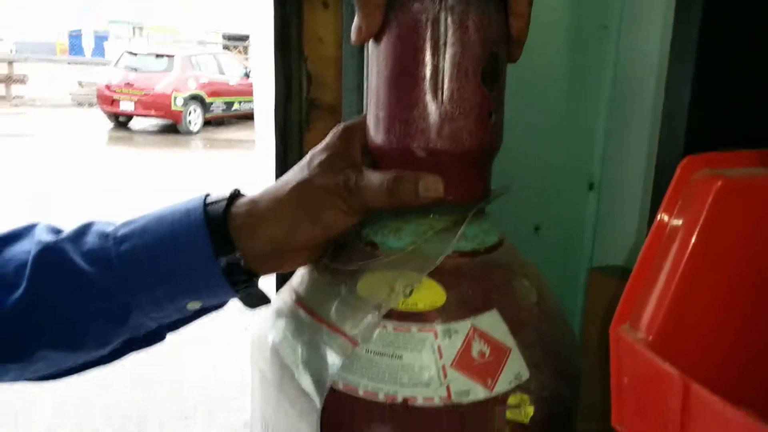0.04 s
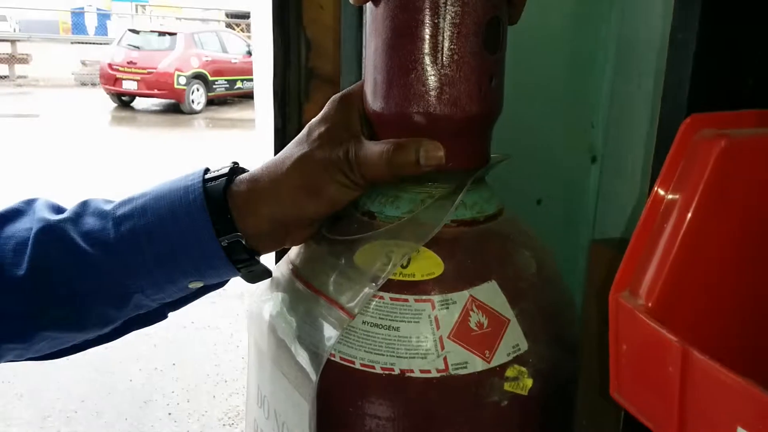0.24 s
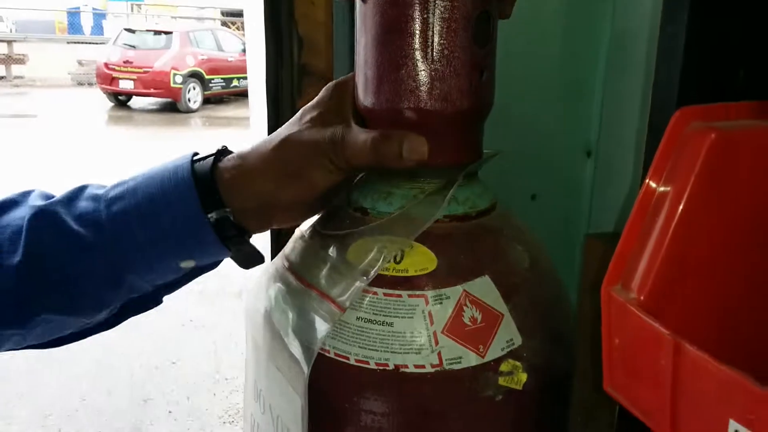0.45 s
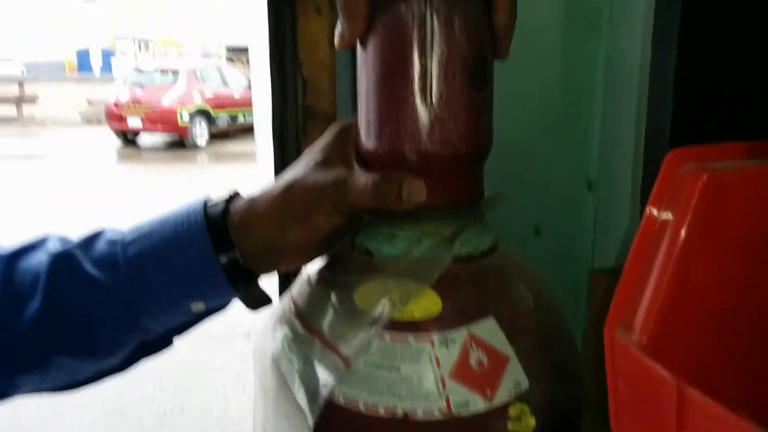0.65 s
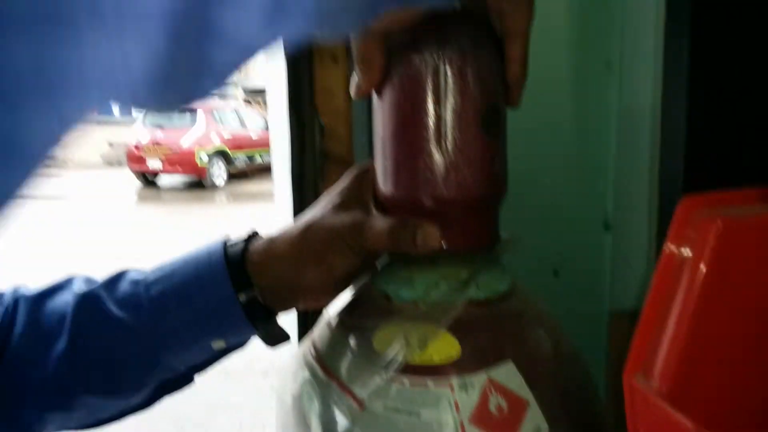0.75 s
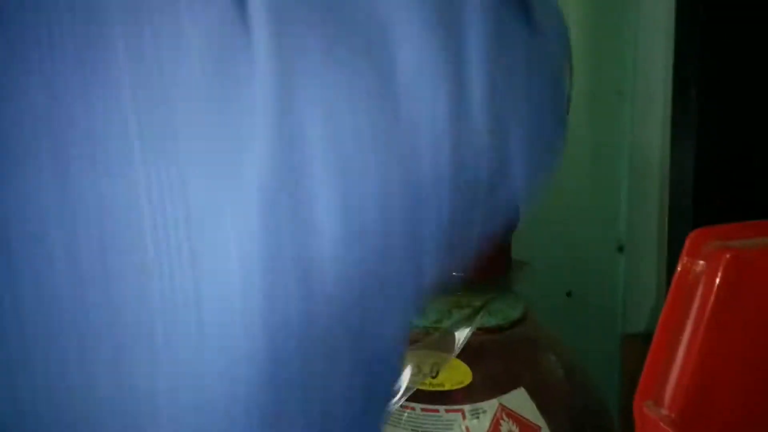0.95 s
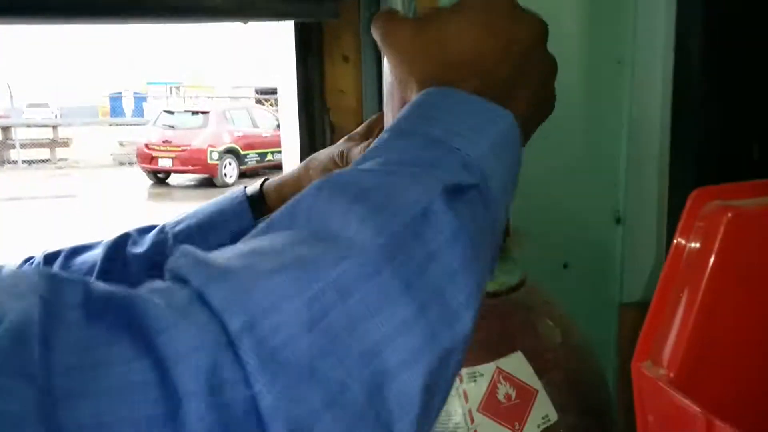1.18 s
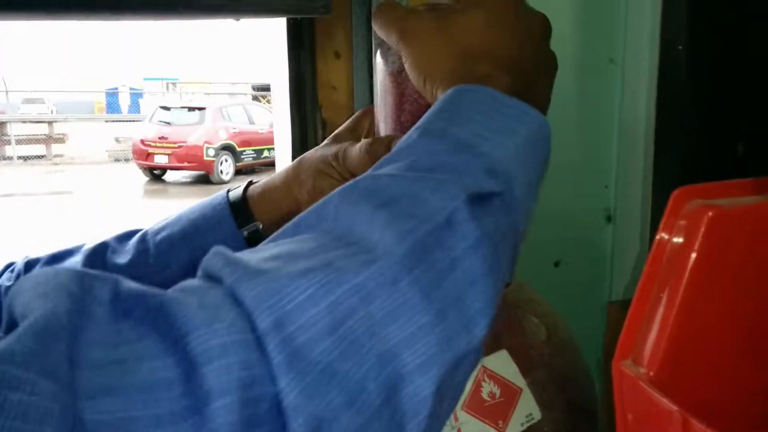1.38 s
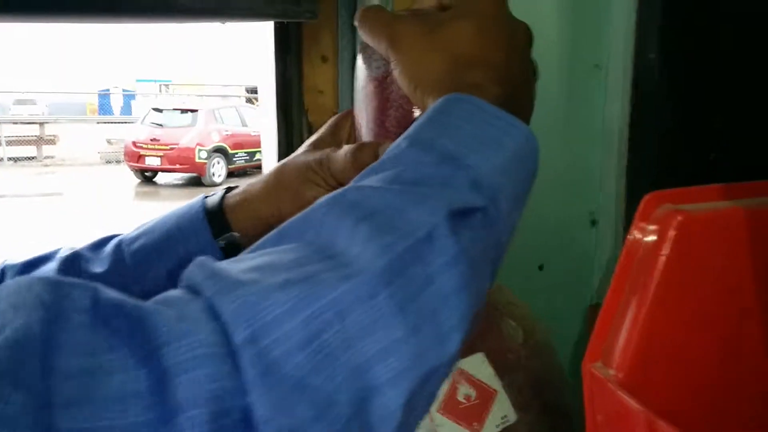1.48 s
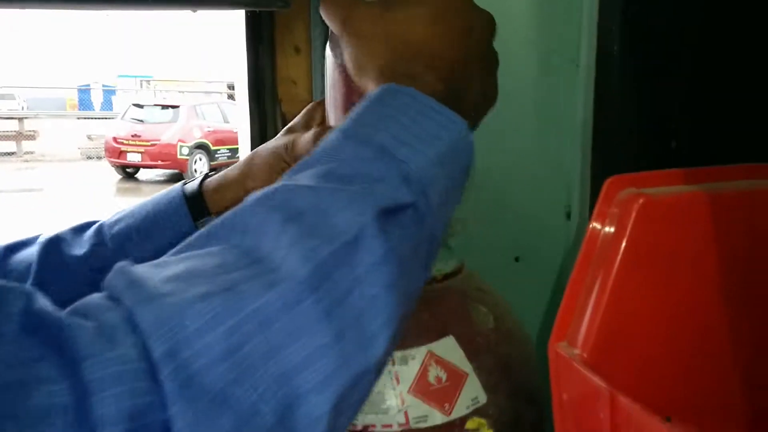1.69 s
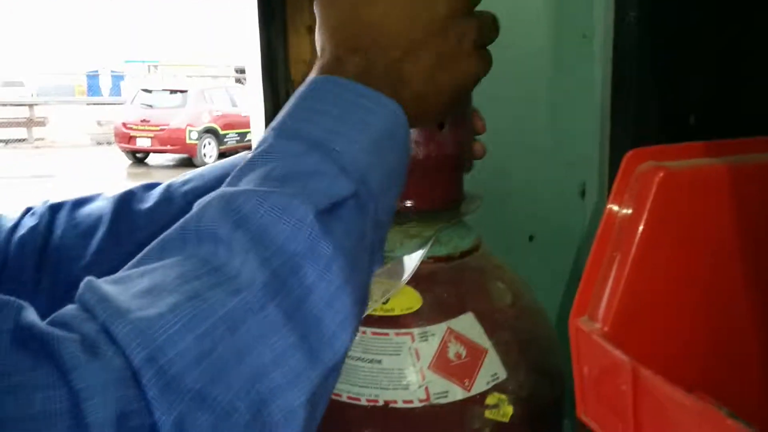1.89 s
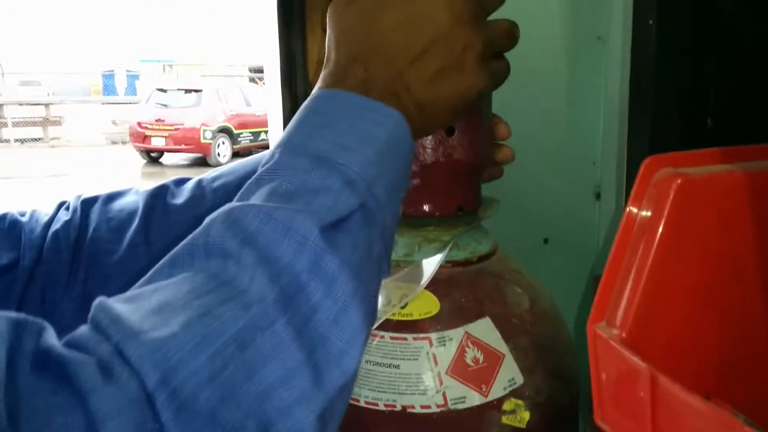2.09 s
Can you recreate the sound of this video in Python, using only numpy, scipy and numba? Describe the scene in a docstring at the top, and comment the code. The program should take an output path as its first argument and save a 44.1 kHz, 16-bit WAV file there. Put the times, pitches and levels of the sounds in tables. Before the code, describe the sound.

Close phone pickup in a shed doorway: quiet hand rubs and soft thumps, then a loud metal squeal breaking into a rough grind and cylinder ring, then another twist, brighter ringing and a hollow tone at the end.

```python
"""In a shed doorway, a steel cap is twisted twice onto the thread of a gas cylinder, close to a phone.
Each twist squeals (a harmonic stack whose slip rate slows) and breaks into a grind of dense clicks.
Damped cap modes color both; the cap clangs, and each jolt sets off decaying cylinder modes and a thud.
Finger scuffs (filtered noise bursts) and soft low thumps (short bass cycles) surround the twists.
Flickering noise bands and a faint hum make the quiet floor; a hollow tone swells at the end."""
import sys
import numpy as np
from scipy import signal
from scipy.fft import rfft, irfft
from scipy.io import wavfile
from scipy.ndimage import uniform_filter1d
from numba import njit

SR = 44100
rng = np.random.default_rng(int(sys.argv[2]) if len(sys.argv) > 2 else 0)


def to_wav(s):
    """Save 16-bit WAV."""
    ch = np.atleast_2d(s).T  # columns
    pcm = np.round(np.clip(ch, -1, 1) * 32767)  # PCM
    wavfile.write(sys.argv[1], SR, pcm.astype(np.int16))


def gain_from_db(level_db):
    """Convert decibel levels to linear amplitude factors (20 dB per decade)."""
    decades = np.asarray(level_db, float) / 20
    return 10 ** decades


N = 94065
TOP_HZ = 15800  # top of the squeal's overtones and of the microphone


def level(x, db):
    """Scale to an rms level."""
    return x * gain_from_db(db) / np.sqrt(np.mean(x ** 2))


def band(x, hz, width_hz):
    """One resonance, gain 1 at the centre."""
    return signal.lfilter(*signal.iirpeak(hz, hz / width_hz, fs=SR), x)


def twice(x, hz, width_hz):
    """A steeper resonance: two in series, each widened so the pair keeps the stated width."""
    wide_hz = 1.55 * width_hz
    return band(band(x, hz, wide_hz), hz, wide_hz)


def walk(rate_hz):
    """Smooth random wander of spread 1."""
    k = max(int(SR / rate_hz), 1)
    noise = rng.standard_normal(N)
    return level(uniform_filter1d(uniform_filter1d(noise, k), k), 0)


def ring(t0, hz, db, t60, rise=0.00075):
    """A decaying mode that starts at t0."""
    t = np.maximum(np.arange(N) / SR - t0, 0)
    return gain_from_db(db - 60 * t / t60) * (1 - np.exp(-t / rise)) * np.sin(2 * np.pi * hz * t)


ROOM_DB, ROOM_T60_S, ROOM_TREBLE_T60_S = -3, 0.6, 0.57
TREBLE_END_S = 0.18  # by now the cut has taken a further 20 dB off the treble


def room(x):
    """Diffuse shed echo, its treble cut off abruptly as if by a noise suppressor."""
    t = np.arange(SR) / SR
    noise = rng.standard_normal(SR) * np.clip(t / 0.0037, 0, 1)
    low, high = (signal.sosfilt(signal.butter(8, 5900, kind, fs=SR, output="sos"), noise)
                 for kind in ("low", "high"))
    low_tail = low * gain_from_db(-60 * t / ROOM_T60_S)
    high_tail = high * gain_from_db(-60 * t / ROOM_TREBLE_T60_S - 20 * (t / TREBLE_END_S) ** 3)
    tail = low_tail + high_tail
    return gain_from_db(ROOM_DB) * signal.fftconvolve(x, tail / np.sqrt(np.sum(tail ** 2)))[:N]


FLOOR_DB, FLOOR_FLICKER_DB, FLOOR_BASS_FLICKER_DB = -66, .6, 8.5
# spectrum of the yard and shed noise: f/Hz, relative level/dB per Hz
FLOOR_SPECTRUM = [(18, -33), (30, -8.5), (90, -8), (176, -13.5), (490, -8), (680, -9.5), (1000, -15.5),
                  (1600, -19.5), (4000, -30), (6000, -35), (15500, -37.5)]


def floor():
    """Quiet yard and shed noise in bands half an octave apart that flicker independently."""
    f = np.fft.rfftfreq(N, 1 / SR) + 1
    table_hz, table_db = np.transpose(FLOOR_SPECTRUM)
    shape = rfft(rng.standard_normal(N)) * gain_from_db(np.interp(np.log(f), np.log(table_hz), table_db))
    out = 0
    for octave in np.arange(4, 15, .5):  # band centre as a power of two in Hz
        flicker_db = FLOOR_BASS_FLICKER_DB if octave < 8 else FLOOR_FLICKER_DB
        weight = np.clip(1 - 2 * abs(np.log2(f) - octave), 0, 1)
        out = out + gain_from_db(flicker_db * walk(50)) * irfft(shape * weight, N)
    return level(out, FLOOR_DB)


def hum():
    """A faint wavering hum: noise through a narrow resonance."""
    return level(twice(rng.standard_normal(N), 488, 16), -75)


SCUFF_T60_S, SCUFF_BROAD_DB, SCUFF_ROOM_DB = 0.055, -41.5, -21
# finger scuffs on the cap: t/s, relative level/dB, length before the decay/s, centre f/Hz
SCUFF_RUBS = [(0.0, -50, 0.022, 1960), (0.042, -48.5, 0.0018, 1800), (0.145, -40.5, 0.018, 1500),
              (0.148, -42, 0.012, 5000), (0.174, -52.5, 0.0055, 830), (0.524, -66, 0.017, 2800),
              (0.703, -73, 0.02, 3470), (0.707, -55.5, 0.002, 1820), (0.821, -62, 0.033, 1970),
              (0.927, -40.5, 0.0051, 3560), (1.023, -53, 0.023, 1640), (1.049, -54.5, 0.019, 1310),
              (1.085, -63, 0.044, 2320), (1.796, -60.5, 0.12, 425)]
# what a scuffed cap rings with: f/Hz, width/Hz, relative level/dB
SCUFF_RESONANCES = [(245, 195, 6.5), (522, 125, 8), (1254, 320, 1), (1800, 206, 3), (2454, 600, -3),
                    (3540, 500, -1), (5000, 460, -4.5)]


def scuffs():
    """Short grainy rubs of band noise that ring a few dull tones, without high treble."""
    t, rubs = np.arange(N) / SR, np.zeros(N)
    noise = rng.standard_normal(N) * gain_from_db(1.65 * walk(410))
    for s, db, length, hz in SCUFF_RUBS:
        decay = gain_from_db(-60 * np.maximum(t - s - length, 0) / SCUFF_T60_S)
        env = np.clip((t - s) / 0.0019, 0, 1) * decay
        rubs += gain_from_db(db) * env * level(band(noise, hz, .7 * hz), 0)
    tones = 1.41 * sum(gain_from_db(db) * twice(rubs, f, w) for f, w, db in SCUFF_RESONANCES)
    out = tones + gain_from_db(SCUFF_BROAD_DB) * rubs
    out = signal.sosfilt(signal.butter(4, 6300, fs=SR, output="sos"), out)
    return out + gain_from_db(SCUFF_ROOM_DB) * room(out)


THUMP_OVERTONE_DB = -18.5
# low thumps: centre t/s, level/dB, length/s, f/Hz
LOW_THUMPS = [(0.184, -51, 0.027, 92), (0.324, -46.5, 0.018, 83), (0.372, -44.5, 0.024, 75),
              (0.663, -48.5, 0.02, 84), (0.867, -45, 0.0069, 91), (0.902, -46.5, 0.084, 83),
              (0.99, -45, 0.034, 90), (1.136, -47, 0.023, 82), (1.161, -43.5, 0.048, 90.3),
              (1.232, -48, 0.034, 97), (1.683, -54.5, 0.12, 89.4), (1.745, -53, 0.023, 78.4),
              (1.443, -30.5, 0.049, 91.3), (1.57, -46.5, 0.12, 87), (1.616, -49, 0.049, 86),
              (1.813, -47, 0.033, 84), (1.873, -48.5, 0.059, 86), (2.125, -44.5, 0.019, 135)]


def thumps():
    """Soft, slightly bent bass cycles under a bell-shaped envelope, with two weak overtones."""
    t, out = np.arange(N) / SR, 0
    for s, db, length, hz in LOW_THUMPS:
        phase = 2 * np.pi * hz * (t - s) + .5 * walk(40)
        env = np.exp(-2 * ((t - s) / length * 2) ** 2)
        overtones = np.sin(2 * phase) + np.cos(3 * phase)
        out = out + gain_from_db(db) * env * (np.sin(phase) + gain_from_db(THUMP_OVERTONE_DB) * overtones)
    return out


CAP_BROAD_DB = -22
# resonances of the hand-damped cap: f/Hz, width/Hz, relative level/dB (before the width weighting)
CAP_MODES = [(880, 920, -6.5), (1360, 89, -4), (1592, 157, 1.5), (1724, 52, 1), (1800, 140, 1),
             (2227, 480, 1), (3530, 184, 6), (3700, 83, 0), (4050, 1100, 3.5), (4710, 110, 3.5),
             (4810, 110, 0), (5105, 160, 2.5), (5440, 290, -7), (6590, 420, -3.5), (7626, 350, -0.5),
             (8300, 600, -5), (10670, 2800, -2), (11200, 400, -1.5), (13500, 5400, -8)]


def cap(x):
    """The cap's damped resonances, alternating in sign, over a broad response."""
    out = gain_from_db(CAP_BROAD_DB) * x
    for k, (f, w, db) in enumerate(CAP_MODES):
        out = out + (-1) ** k * gain_from_db(db) * np.sqrt(300 / w) * twice(x, f, w)
    return out


SQUEAL_DIRECT_DB, SQUEAL_CAP_DB = -1, -13
SQUEAL_WAVER_DB, SQUEAL_WAVER_HZ, SLIP_JITTER = 1.8, 250, .006
# overtones blur as the slips slow; smear in radians per overtone
STEADY_SLIP_HZ, SMEAR_RAD, SMEAR_PER_SLOWING, SMEAR_HZ = 1620, .05, 1.1, 1200
GRIND_CLICKS_HZ, GRIND_SCATTER_DB = 3500, 3  # mean click rate, scatter scale
# course of each twist: t/s, slip rate f/Hz, relative squeal level/dB,
# tilt/dB per harmonic step up to the third harmonic, relative grind level/dB
FIRST_TWIST = [(1.403, 1480, -66, -20, -70), (1.409, 1470, -28, -16, -52), (1.413, 1440, -10, -7, -34),
               (1.417, 1420, -17, -4, -31), (1.422, 1390, -11, -5, -28), (1.428, 1130, -16, -1, -23),
               (1.436, 880, -23, 4, -19), (1.444, 780, -36, 7, -17), (1.46, 600, -60, 0, -17),
               (1.52, 500, -70, 0, -18), (1.558, 500, -70, 0, -19), (1.575, 500, -70, 0, -40),
               (1.62, 500, -70, 0, -70)]
SECOND_TWIST = [(1.974, 1653, -48, -51, -92), (1.982, 1636, -7.5, -2, -18), (1.985, 1552, -20.5, 1, -30),
                (1.998, 1624, -15, 1.5, -41), (2.011, 1593, -21, 2.5, -53), (2.022, 1480, -16.5, 2.5, -10),
                (2.022, 1338, -19, 3, -19.5), (2.042, 845, -41, 11, -9), (2.077, 605, -82.5, -6, -19),
                (2.14, 556, -75, 1, -21.5)]
# squeal harmonics: multiple of the slip rate, relative level/dB
SQUEAL_HARMONICS = [(1, 0), (2, -4), (3, -6), (4, -12), (5, -11), (6, -13), (7, -12), (8, -13), (9, -16),
                    (10, -16), (11, -17), (13, -13), (15, -13)]


def thread():
    """Regular slips give a wavering overtone stack, irregular ones a dense grind; both ring the cap."""
    t = np.arange(N) / SR
    rows = np.array(FIRST_TWIST + SECOND_TWIST)
    first_on = (t > FIRST_TWIST[0][0]) & (t < FIRST_TWIST[-1][0])
    on = first_on | (t > SECOND_TWIST[0][0])
    hz, squeal_db, tilt_db, grind_db = (np.interp(t, rows[:, 0], rows[:, c]) for c in range(1, 5))
    phase = 2 * np.pi * np.cumsum(hz * (1 + SLIP_JITTER * walk(347))) / SR
    smear = SMEAR_RAD + SMEAR_PER_SLOWING * np.maximum(1 - hz / STEADY_SLIP_HZ, 0)
    stack = 0
    for k, db in SQUEAL_HARMONICS:
        waver_db = SQUEAL_WAVER_DB * min(k - .5, 2) * walk(SQUEAL_WAVER_HZ)
        gain = (k * hz < TOP_HZ) * gain_from_db(db + tilt_db * min(k - 1, 2) + waver_db)
        blur = (k - 1) * smear * walk(SMEAR_HZ)
        stack = stack + gain * np.sin(k * phase + blur + 2 * np.pi * rng.random())
    squeal = on * gain_from_db(squeal_db) * stack * np.sqrt(2)
    chance = rng.random((3, N))
    sign = np.sign(chance[1] - .5)
    strength = gain_from_db(-GRIND_SCATTER_DB * np.log(chance[2] + 1e-9))
    clicks = (chance[0] < GRIND_CLICKS_HZ / SR) * sign * strength
    grind = cap(clicks * on * gain_from_db(grind_db)) / np.std(cap(clicks))
    return gain_from_db(SQUEAL_DIRECT_DB) * squeal + gain_from_db(SQUEAL_CAP_DB) * cap(squeal) + grind


# single cap modes as the squeal breaks: t/s, f/Hz, level/dB before the waver, t60/s
CAP_CLANGS = [(1.424, 3490, -11, .1), (1.432, 1790, -14, .08), (1.441, 5040, -10, .07),
              (1.474, 5000, -12, .07), (1.513, 1760, -15, .12), (2.022, 3660, -9, .15),
              (2.05, 1750, -16, .12)]


def clangs():
    """Single cap modes clang and decay, sharing one fast waver in level."""
    return gain_from_db(2.5 * walk(150)) * sum(ring(*row) for row in CAP_CLANGS)


JOLT_THUD_HZ, JOLT_THUD_T60_S, JOLT_ROOM_DB = 191.4, 0.19, -9


def thud(jolt_s, db):
    """A decaying burst of low band noise, starting 15 ms before the ring, with its shed echo."""
    t = np.maximum(np.arange(N) / SR - jolt_s + .015, 0)
    noise = level(band(rng.standard_normal(N), JOLT_THUD_HZ, 150), 0)
    out = (1 - np.exp(-t / 0.0018)) * gain_from_db(db - 60 * t / JOLT_THUD_T60_S) * noise
    return out + gain_from_db(JOLT_ROOM_DB) * room(out)


RING_WAVER_DB, RING_WAVER_HZ = 3, 14  # waver depth from 3 kHz up, less below
# the thread catching and jolting the cylinder: t/s, thud level/dB
THREAD_JOLTS = [(1.445, -25), (2.045, -34)]
# cylinder modes: f/Hz
CYLINDER_MODES_HZ = [664.5, 1083, 1092, 1233, 1357.8, 2224.5, 2740, 3003, 3044, 3488, 3578, 4269.5, 4601,
                     4974, 5168, 5981, 6487, 7545, 8210, 8810]
# for each mode: level/dB after the first jolt, level/dB after the second, t60/s (before the waver)
CYLINDER_RINGS = [(-29, -29.5, 1.39), (-25.5, -21.5, 1.61), (-26.5, -25, 1.26), (-29, -21.5, 2.3),
                  (-62, -23.5, 3.4), (-18.5, -12, 0.62), (-29, -23, 0.89), (-26.5, -21.5, 0.92),
                  (-32, -7, 0.81), (-21.5, -43, 0.4), (-42, -19, 0.78), (-31.5, -31, 1.7),
                  (-40.5, -38, 0.23), (-39.5, -40, 0.45), (-19.5, -40, 0.55), (-47, -18, .3),
                  (-37, -40, .3), (-40.5, -39.5, 0.17), (-12, -26, 0.23), (-34, -12.5, 0.3)]


def cylinder():
    """Every jolt thuds and rings the same decaying modes, the upper ones wavering most in level."""
    out = np.zeros(N)
    for j, (s, thud_db) in enumerate(THREAD_JOLTS):
        for hz, row in zip(CYLINDER_MODES_HZ, CYLINDER_RINGS):
            waver_db = RING_WAVER_DB * min(hz / 3000, 1) ** 2 * walk(RING_WAVER_HZ)
            out += gain_from_db(waver_db) * ring(s, hz, row[j], row[2], 0.055)
        out += thud(s, thud_db)
    return out


def knock():
    """A hollow tone swelling at the end: one mode with a slow rise."""
    return ring(2.105, 545, -11, .5, rise=0.019)


def scene():
    """Thread noise fills the shed; scuffs and thuds bring their own echo; the remaining sources stay dry."""
    steel = thread()
    background = floor() + hum()
    handling = scuffs() + thumps()
    ringing = clangs() + cylinder() + knock()
    return (background + handling + steel + room(steel) + ringing)[None]


@njit
def follow(x, attack, release):
    """Peak follower; attack and release are the share of the gap closed per sample."""
    e, y = 1e-9, np.empty(len(x))
    for i in range(len(x)):
        e += (abs(x[i]) - e) * (attack if abs(x[i]) > e else release)
        y[i] = e
    return y


LIMIT_DB, LIMIT_RATIO, LIMIT_RELEASE_S = -3.5, 13, 0.12
CLIP = 1  # ceiling of the soft rounding


def roll_off(x):
    """The treble ends steeply here."""
    return signal.sosfilt(signal.butter(12, 16990, fs=SR, output="sos"), x)


def record(dry):
    """The phone limits and rounds loud peaks and cuts the top."""
    envelope = follow(dry[0], 0.14, 1 / (LIMIT_RELEASE_S * SR))
    limited = dry * np.minimum(gain_from_db(LIMIT_DB) / envelope, 1) ** (1 - 1 / max(LIMIT_RATIO, 1))
    rounded = CLIP * np.tanh(limited / CLIP)
    mix = signal.sosfilt(signal.ellip(8, .2, 60, TOP_HZ, fs=SR, output="sos"), rounded)
    return roll_off(mix)


dry = scene()
out = record(dry)
to_wav(out)
```